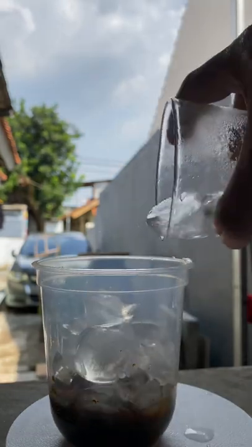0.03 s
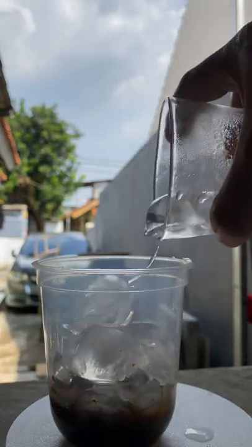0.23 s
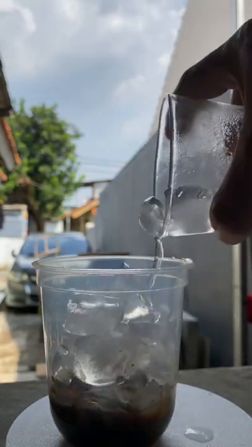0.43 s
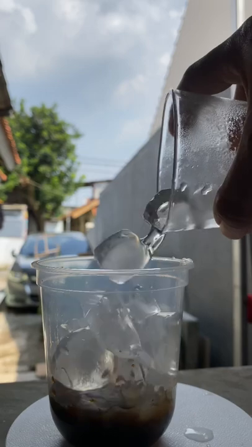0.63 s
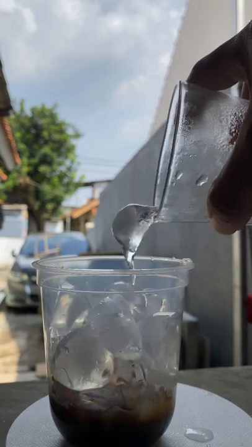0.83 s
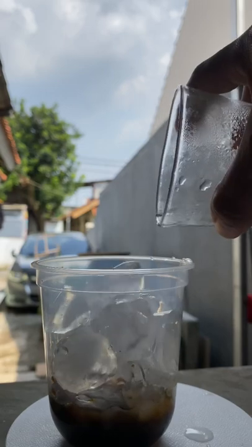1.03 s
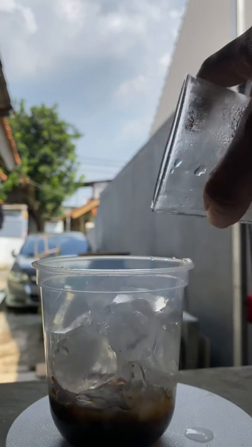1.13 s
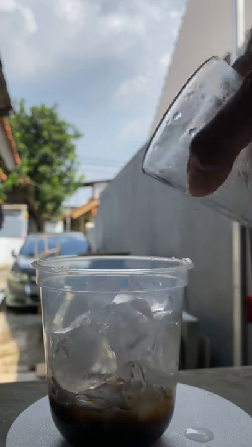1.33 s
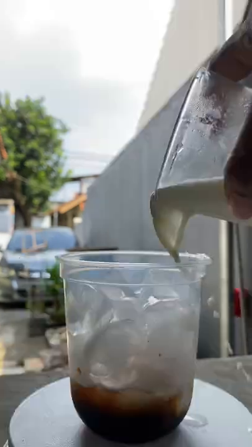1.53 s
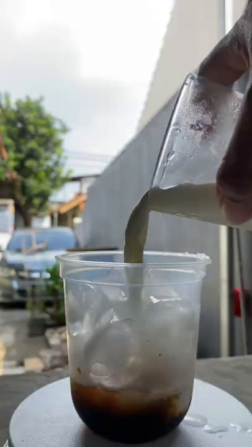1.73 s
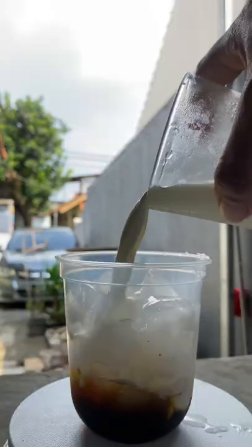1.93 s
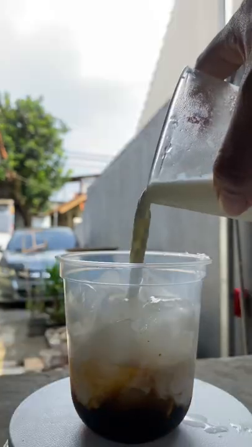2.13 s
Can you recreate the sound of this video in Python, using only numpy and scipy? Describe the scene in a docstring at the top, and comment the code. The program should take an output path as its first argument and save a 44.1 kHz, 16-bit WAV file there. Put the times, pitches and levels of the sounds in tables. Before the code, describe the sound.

Ice cubes clatter into a plastic cup, then liquid trickles faintly over them.

```python
"""Faint glassy taps as ice slides out of a beaker, then a close tumble into a thin plastic cup of ice.
The cubes knock hollow notes from the wall, clack and clink on one another, thud onto the pile and
scrape as they settle. Then a thin stream trickles over them in tiny bubbles, splashes and droplets.
Outdoors: a low rumble like distant traffic, a little hiss, and a short answer from nearby walls."""
import sys
import numpy as np
from scipy import signal
from scipy.fft import rfft, irfft, next_fast_len
from scipy.io import wavfile
from scipy.ndimage import uniform_filter1d, map_coordinates

SR = 44100
rng = np.random.default_rng(int(sys.argv[2]) if len(sys.argv) > 2 else 0)


def store_wav(level_fs):
    """Save 16-bit WAV to argv[1]."""
    pcm = np.round(np.clip(np.atleast_2d(level_fs), -1, 1) * 32767)
    wavfile.write(sys.argv[1], SR, pcm.T.astype(np.int16))


N = 97020

# ice knocking the cup wall: t/s, level/dB
KNOCK_CUES = [(.233, -28), (.2385, -4), (0.247, -16.5), (0.2547, -21.5), (0.2781, -18), (0.2894, -16),
              (0.3104, -15.5), (.317, -25.5), (0.3479, -20), (0.392, -33), (.400, -9.5), (0.4042, -13.5),
              (0.418, -9.5), (.434, -24.5), (0.476, -16), (0.4935, -25), (.504, -18), (0.516, -18.5),
              (0.5306, -15), (.546, -25), (0.5635, -18), (0.573, -22), (0.6029, -21), (.623, -31),
              (0.6294, -30.5), (0.6659, -11.5), (0.6766, -16.5), (0.7288, -14), (0.776, -24.5),
              (0.7832, -18), (0.7946, -20.5), (.821, -24), (.834, -22.5), (0.855, -29), (0.861, -30),
              (.880, -15.5), (0.8942, -18.5), (0.9008, -21.5), (0.918, -22), (.923, -20), (0.9428, -24),
              (.949, -27), (.9943, -20.5), (1.131, -30), (1.1804, -40), (1.1978, -36)]
# cup wall modes: f/Hz, level/dB, time to the top of the burst/s
CUP_MODES = [(1199, -1, 0.0023), (2192, -13, .0021), (1680, -33, 0.001), (3440, -30, 0.00033)]
# ice clacking on ice or on the beaker: t/s, level/dB, tilt above 1 kHz/(dB per octave)
CLACK_CUES = [(.038, -40, -1), (0.0502, -36.5, 27), (.066, -37.5, -1), (0.0882, -29.5, 0),
              (0.1131, -30.5, 19), (0.131, -34.5, 6), (.195, -38.5, 16.5), (0.232, -18.5, -3.5),
              (0.2373, -8, -4.5), (0.242, -17.5, -7.5), (0.312, -20.5, -0.5), (0.3168, -22.5, -4),
              (.371, -32, 3.5), (0.3996, -16, -4), (0.4143, -14.5, -2.5), (.4181, -15.5, 1),
              (0.49, -36, 6.5), (.5308, -20, -2.5), (0.542, -25, 4), (.556, -20.5, 1), (0.5683, -19, 2.5),
              (0.5749, -16.5, -3.5), (.581, -23.5, 2), (0.5925, -22.5, 2.5), (.598, -23.5, -2),
              (.618, -27, 6.5), (0.6648, -14.5, -1.5), (.670, -14, -1.5), (.726, -23, -11.5),
              (0.7477, -31.5, 0.5), (.774, -23, -1), (0.7823, -12, 6), (.795, -20.5, 0.5), (.810, -27, 2),
              (.8225, -22.5, 3), (.856, -20.5, 5), (0.8794, -21.5, -0.5), (0.8923, -18, -3.5),
              (0.92, -31, 3), (.943, -27, 0), (.9935, -30.5, -3), (1.1286, -21, 0.5), (1.1968, -29, -1.5)]
# ice cube modes: f/Hz, level/dB, t60/s
ICE_MODES = [(3414, -19, 0.032), (6520, -21, 0.022), (9760, -33, 0.016), (13620, -33.5, 0.023)]
# small cubes touching lightly: t/s, level/dB, f/Hz
CLINK_CUES = [(.114, -35.5, 6100), (.0885, -35.5, 3510), (.292, -21.5, 3200), (.303, -19.5, 3170),
              (.308, -22, 3100), (.3175, -27.5, 6350), (.337, -33, 6400), (.371, -25.5, 6300),
              (.569, -29, 7000), (.575, -15, 3450), (.6705, -19.5, 3380), (.7495, -31, 6500),
              (.750, -24.5, 4270), (.774, -34, 10100), (.856, -24, 4270), (1.1292, -25, 3470),
              (1.197, -33.5, 3370), (1.197, -31, 6470)]
# the weight of a cube landing on the pile: t/s, level/dB, f/Hz
THUD_CUES = [(0.237, -30, 450), (0.3182, -28.5, 330), (0.402, -32, 400), (0.4198, -28.5, 260),
             (.594, -26.5, 318), (0.627, -30.5, 250), (.669, -20.5, 427), (.674, -25.5, 190),
             (.7835, -28, 760), (.785, -22, 290), (0.826, -28.5, 295), (.895, -29.5, 219),
             (.921, -33.5, 380)]
# fader for cubes scraping and settling: t/s, level/dB
JOSTLE_FADER = [(0, -63), (.08, -66), (.125, -53), (.18, -76), (.225, -52.5), (.245, -38), (.36, -46),
                (.39, -45.5), (.42, -32.5), (.47, -47), (.525, -38), (.545, -38), (.59, -33), (.655, -40.5),
                (.68, -41.5), (.72, -45), (.765, -41), (.80, -39.5), (.85, -36.5), (.876, -47.5),
                (.90, -36.5), (.93, -34), (1.0, -45.5), (1.05, -60.5), (1.12, -71.5), (1.14, -49),
                (1.2, -47), (1.27, -79.5)]
# ice tapping the beaker as it starts to slide: t/s, level/dB
TAP_CUES = [(.089, -53), (0.1139, -43.5), (.121, -52), (.131, -46), (.158, -52.5)]
# beaker modes: f/Hz, level/dB, t60/s
BEAKER_MODES = [(2326, -16, .25), (4040, -5.5, .13), (5840, -7, 0.092), (7640, -7.5, .1),
                (10770, -10.5, .07)]
# splashes of the pour: t/s, level/dB, f/Hz
SPLASH_CUES = [(1.701, -51, 2190), (1.710, -38, 7960), (1.726, -43.5, 8200), (1.723, -36.5, 2710),
               (1.727, -40, 2830), (1.766, -47, 7600), (1.778, -45.5, 10800), (1.809, -36, 6600),
               (1.824, -48.5, 4770), (1.853, -38.5, 8750), (1.871, -39.5, 2220), (1.872, -40.5, 7500),
               (1.887, -38.5, 6830), (1.9714, -35, 5180), (1.982, -38.5, 6500), (2.0168, -34.5, 1730),
               (2.0175, -36, 2800), (2.018, -45, 900), (2.025, -44, 1850), (2.0582, -35, 2426),
               (2.067, -39.5, 5050), (2.067, -42, 2800), (2.089, -41.5, 2405), (2.18, -44.5, 1880),
               (2.188, -37, 7200)]
# drops striking the cup wall: t/s, level/dB
WALL_DROP_CUES = [(1.572, -54.5), (1.753, -43.5), (1.791, -42), (1.951, -41.5), (1.958, -49),
                  (2.027, -39.5), (2.087, -40.5), (2.188, -38.5)]
# fader for the droplet patter: t/s, level/dB
PATTER_FADER = [(1.52, -90.5), (1.58, -65.5), (1.68, -65), (1.72, -58), (1.84, -58), (1.96, -55),
                (2.08, -52.5), (2.14, -58.5), (2.2, -53.5)]
# faders for the traffic rumble and the drone within it: t/s, level/dB
RUMBLE_FADER = [(0, -44), (.6, -44), (.9, -43), (1.0, -38.5), (1.12, -41), (1.24, -43), (1.35, -42),
                (1.50, -43.5), (1.53, -48), (1.82, -45), (2.2, -46.5)]
DRONE_FADER = [(0, -44.5), (.5, -45.5), (.75, -43.5), (.87, -38), (1.0, -41.5), (1.2, -47.5), (1.33, -42.5),
               (1.49, -45.5), (1.54, -62), (2.2, -57)]
# tone colour of each noise layer: f/Hz, relative level/dB
CLACK_EQ = [(200, -14.5), (800, -13), (1500, -5.5), (2200, 5), (2700, -2.5), (3400, 5), (4300, -4),
            (6700, -5), (7700, -6.5), (8500, -16), (10000, -15.5), (12000, -29), (13500, -22.5),
            (14700, -40), (16000, -36)]
THUD_EQ = [(60, -25.5), (150, -3.5), (320, 3.5), (550, -6.5), (850, -6), (1500, -20), (4000, -45.5)]
JOSTLE_EQ = [(100, 0), (220, 12.5), (450, 2.5), (800, 2.5), (1170, 10), (1500, -1.5), (2150, 2), (2700, 3),
             (3400, -1.5), (4200, -3), (6500, -7), (7700, -11), (8500, -23), (10000, -23), (12000, -45.5),
             (13600, -29), (14700, -32), (16000, -34)]
PATTER_EQ = [(400, -23), (700, 0), (1200, 6), (1460, 1.5), (1850, 1.5), (2800, 4), (3600, 1), (4700, -5.5),
             (7000, -6.5), (8200, -11), (9700, -14), (12000, -22), (16000, -36.5)]
RUMBLE_EQ = [(20, -33.5), (40, -15.5), (62, -3), (82, 4), (110, -7.5), (141, -12), (175, -6.5),
             (240, -10.5), (330, -19.5), (600, -25.5), (1200, -45), (4000, -86.5)]
AIR_EQ = [(200, 4.5), (600, 6.5), (1200, -0.5), (1700, -3), (3500, -8), (7000, -16.5), (9000, -25.5),
          (12000, -30), (15000, -36)]
# resonances of the cup's hollow: f/Hz, width/Hz, gain over the direct sound/ratio
HOLLOW_MODES = [(1214, 120, 0.46), (2160, 77, 0.38), (3360, 143, 0.41)]
# reverb time of the nearby walls: f/Hz, t60/s
WALL_DECAY = [(150, 0.43), (1200, 0.27), (4000, 0.23), (8000, 0.21), (15000, 0.21)]
# the cup's balance at the two microphone ports: f/Hz, left minus right/dB
CUP_PAN = [(150, -2.5), (600, -8.5), (1150, -0.5), (1700, -4.5), (2200, -3), (3300, -3), (4800, -3.5),
           (7000, -1), (14000, -1)]
# phase between the ports at full lead: f/Hz, left lead/rad
LEFT_LEAD = [(500, 0.82), (1150, 1.03), (2100, 1.44), (2800, 2.87), (4000, 4.8), (6300, 5.1), (7500, 10.8),
             (9000, 7.13), (14000, 8.4)]

ICE_ATTACK_S = 0.00048


def amp(db):
    """Decibels to gain."""
    return 10 ** (np.asarray(db) / 20)


def unit(x):
    """Scale to rms 1."""
    return x / np.sqrt(np.mean(x ** 2) + 1e-20)


def along(points, hz):
    """Read a curve of (f/Hz, value) points on a log frequency axis."""
    f, values = np.transpose(points)
    return np.interp(np.log(hz + 1), np.log(f + 1), values)


def fader(rows):
    """Gain per sample from (t/s, level/dB) rows."""
    return amp(np.interp(np.arange(N) / SR, *np.transpose(rows)))


def bell(offset, width, power=2):
    """Bell curve: 1 at the centre, one half at an offset of one width."""
    return 1 / (1 + (offset / width) ** power)


def filtered(x, response):
    """Shape x with a frequency response."""
    n = x.shape[-1]
    padded = next_fast_len(n + SR // 10)
    return irfft(rfft(x, padded) * response(np.fft.rfftfreq(padded, 1 / SR)), padded)[..., :n]


def coloured(x, eq, tilt_db=0):
    """EQ x, tilt it per octave above 1 kHz and scale it to rms 1."""
    return unit(filtered(x, lambda f: amp(along(eq, f) + tilt_db * np.log2(np.maximum(f / 1000, 1)))))


def stereo(mid, side, side_db):
    """Mid and side to left and right."""
    return mid + amp(side_db) * np.array([side, -side])


def add(track, s, sound):
    """Mix a sound in at s seconds."""
    i = int(np.clip(round(s * SR), 0, N))
    track[..., i:i + sound.shape[-1]] += sound[..., :N - i]


def grains(spread_db, clump_db, per_s=1500, clumps_per_s=64):
    """Random tiny impacts that come in clumps, a few much larger than the rest."""
    swells = rng.standard_normal(int(N * clumps_per_s / SR) + 4)
    clumps = map_coordinates(swells, [np.arange(N) * clumps_per_s / SR])
    clicks = (rng.random(N) < per_s / SR) * rng.choice([-1, 1], N)
    sizes = np.minimum(rng.exponential(size=N), 3)
    return unit(clicks * amp(clump_db * clumps + spread_db * sizes))


def knocks(sag_per_s=0.04, ring_db=-15, ring_t60=0.057):
    """The thin wall gives a hollow burst and a faint after-ring; its pitch sinks as the cup fills."""
    out, t = np.zeros(N), np.arange(SR // 10) / SR
    for s, db in KNOCK_CUES:
        for hz, mode_db, top_s in CUP_MODES:
            burst_tune, ring_tune = rng.normal(1, [0.018, 0.06])
            age = t / top_s
            phase = 2 * np.pi * hz * (1 - sag_per_s * s) * t
            burst = age * np.exp((1 - age ** 2) / 2) * np.sin(phase * burst_tune)
            ring = amp(ring_db - 60 * t / ring_t60) * (1 - np.exp(-age)) * np.sin(phase * ring_tune)
            add(out, s, amp(db + mode_db) * (burst + ring))
    return out


def clacks(crack_s=0.0015, tail_s=0.012, tail_db=-16):
    """A hard, wide crack with a short crumbling tail; each cube rings at its own pitch."""
    out, t = np.zeros((2, N)), np.arange(SR // 10) / SR
    attack = 1 - np.exp(-t / ICE_ATTACK_S)
    decay = np.exp(-t / crack_s) + amp(tail_db) * np.exp(-t / tail_s)
    for s, db, tilt_db in CLACK_CUES:
        mid, side = coloured(rng.standard_normal((2, len(t))), CLACK_EQ, tilt_db)
        crack = attack * decay * unit(stereo(mid, side, side_db=-4))
        ring = 0
        for hz, mode_db, t60 in ICE_MODES:
            fade = amp(mode_db + rng.normal(0, 2) - 60 * t / t60)
            ring += fade * np.sin(2 * np.pi * hz * rng.normal(1, 0.016) * t)
        add(out, s, amp(db) * (crack + ring))
    return out


def clinks(decay_s=0.0027):
    """A glancing touch rings one mode of a cube, which wet ice damps fast."""
    out, t = np.zeros(N), np.arange(SR // 20) / SR
    envelope = (1 - np.exp(-t / ICE_ATTACK_S)) * np.exp(-t / decay_s)
    for s, db, hz in CLINK_CUES:
        add(out, s, amp(db) * envelope * np.sin(2 * np.pi * hz * t))
    return out


def thuds(attack_s=0.00043, decay_s=0.0044, boom_top_s=0.0028, boom_db=-5):
    """A landing cube sends a dull push through the pile and a short boom from the cup's base."""
    out, t = np.zeros(N), np.arange(SR // 10) / SR
    envelope = (1 - np.exp(-t / attack_s)) * np.exp(-t / decay_s)
    for s, db, hz in THUD_CUES:
        push = envelope * coloured(rng.standard_normal(len(t)), THUD_EQ)
        boom = t / boom_top_s * np.exp(1 - t / boom_top_s) * np.sin(2 * np.pi * hz * t)
        add(out, s, amp(db) * (push + amp(boom_db) * boom))
    return out


def jostle(chatter_hz=1176, chatter_db=-7):
    """Wet cubes scrape and settle in a spray of tiny contacts, which set the cup wall chattering."""
    contacts = np.array([grains(spread_db=5, clump_db=1.5) for _ in range(3)])
    mid, side = coloured(contacts[:2], JOSTLE_EQ)
    chatter = unit(filtered(contacts[2], lambda f: bell(f - chatter_hz, width=130, power=4)))
    return fader(JOSTLE_FADER) * (stereo(mid, side, side_db=-9) + amp(chatter_db) * chatter)


def beaker():
    """Each tap of the sliding ice leaves the beaker ringing faintly."""
    out, t = np.zeros(N), np.arange(SR // 4) / SR
    attack = 1 - np.exp(-t / ICE_ATTACK_S)
    for s, db in TAP_CUES:
        for hz, mode_db, t60 in BEAKER_MODES:
            fade = amp(db + mode_db + rng.normal(0, 2.05) - 60 * t / t60)
            add(out, s, attack * fade * np.sin(2 * np.pi * hz * t + rng.uniform(0, 2 * np.pi)))
    return out


def blip(hz, t, cycles_to_top, glide=0.012):
    """The note of a bubble or drop: a soft start and a slight rise in pitch."""
    age = t * hz / cycles_to_top
    return age * np.exp(1 - age) * np.sin(2 * np.pi * hz * t * (1 + glide * np.minimum(age, 4)))


def splashes(bubble_db=-2.5, spray_db=-3.5, cycles_to_top=4.5, width_octaves=0.34):
    """A short bubble inside a wet spray around the same pitch; small, high drops snap faster."""
    out, t = np.zeros(N), np.arange(SR // 30) / SR
    for s, db, hz in SPLASH_CUES:
        age = t * hz / cycles_to_top
        noise = rng.standard_normal(len(t))
        band = filtered(noise, lambda f: (1 + (np.log2((f + 1) / hz) / width_octaves) ** 2 / 2) ** -2)
        spray = age * np.exp(1 - age) * unit(band)
        bubble = blip(hz, t, cycles_to_top=4.6)
        add(out, s, amp(db) * (amp(bubble_db) * bubble + amp(spray_db) * spray))
    return out


def wall_drops(note_hz=1220):
    """Drops strike the cup wall and sound its hollow note."""
    out, t = np.zeros(N), np.arange(SR // 30) / SR
    for s, db in WALL_DROP_CUES:
        add(out, s, amp(db) * blip(note_hz * rng.normal(1, 0.026), t, cycles_to_top=2.9))
    return out


def patter(lowest_hz=1250):
    """Four sizes of droplet, an octave apart, land softly in clumps of their own."""
    droplets = np.zeros(N)
    for octave in range(4):
        impacts = grains(spread_db=3, clump_db=3)
        droplets += filtered(impacts, lambda f: bell(np.log2((f + 1) / lowest_hz) - octave, width=0.5))
    return fader(PATTER_FADER) * unit(in_cup(coloured(droplets, PATTER_EQ)))


def in_cup(x):
    """The hollow of the cup rings along with what happens in it."""
    return filtered(x, lambda f: 1 + sum(gain * 1j * f * width / (hz ** 2 - f ** 2 + 1j * f * width)
                                         for hz, width, gain in HOLLOW_MODES))


def placed(x, wet_db, scatter_db, lead_share=1, scatter_s=0.0008, low_cut_hz=1900):
    """Direct sound at two microphone ports, quick scatter off cup and table, and the walls' answer."""
    hz, t, spectrum = signal.stft(rng.standard_normal((2, SR // 2)), SR, nperseg=256)
    envelope = amp(-60 * t / along(WALL_DECAY, hz)[:, None]) * (1 - np.exp(-t / 0.001))
    tail = signal.istft(spectrum * envelope, SR, nperseg=256)[1]
    tail = tail + 0.077 * tail[::-1]  # slight bleed between left and right
    scatter = rng.standard_normal(tail.shape) * np.exp(-np.arange(tail.shape[1]) / SR / scatter_s)
    scatter = filtered(scatter / np.linalg.norm(scatter[0]), lambda f: 1 - bell(f, low_cut_hz))
    reflections = amp(wet_db) * tail / np.linalg.norm(tail[0]) + amp(scatter_db) * scatter
    wet = signal.fftconvolve(np.atleast_2d(x), reflections, axes=1)[:, :N]
    split = np.array([[.5], [-.5]])
    direct = filtered(x, lambda f: np.exp(1j * split * lead_share * along(LEFT_LEAD, f)))
    return filtered(direct + wet, lambda f: amp(split * along(CUP_PAN, f)))


def traffic(drone_hz=140.3):
    """A distant, nearly mono rumble with a narrow drone in it, as of a far engine."""
    drone = unit(filtered(rng.standard_normal(N), lambda f: bell(f - drone_hz, width=17)))
    rumble = stereo(*coloured(rng.standard_normal((2, N)), RUMBLE_EQ), side_db=-23)
    return (fader(RUMBLE_FADER) * rumble + fader(DRONE_FADER) * drone) * amp([[-.6], [.6]])


def background(air_db=-61.5, dip_at_s=1.511, dip_length_s=0.014, dip_db=-18):
    """A bed of traffic and wide, faint open-air hiss; its level dips briefly once."""
    t = np.arange(N) / SR
    in_dip = (t > dip_at_s) & (t < dip_at_s + dip_length_s)
    dip = uniform_filter1d(amp(dip_db * in_dip), size=90)
    rumble = traffic()
    air = stereo(*coloured(rng.standard_normal((2, N)), AIR_EQ), side_db=0.5)
    return dip * (rumble + amp(air_db) * air)


def scene():
    """Ice, then liquid, close up in the open air."""
    cup = placed(knocks(), wet_db=-16.5, scatter_db=-13)
    cubes = in_cup(clacks() + clinks() + thuds() + jostle())
    ice = placed(cubes + beaker(), wet_db=-12, scatter_db=-9)
    pour = placed(splashes() + wall_drops() + patter(), wet_db=-14.5, scatter_db=-9, lead_share=0.22)
    pour *= amp([[1.7], [-1.7]])  # nudged to the left of the ice
    return cup + ice + pour + background()


def record(dry, peak_hz=13550, peak_db=5, top_hz=16000):
    """A narrow lift in the top treble brings out the highest ring of the ice; a steep high cut follows."""
    bright = filtered(dry, lambda f: amp(peak_db * bell(f - peak_hz, width=380)))
    return filtered(bright, lambda f: 1 / (1 + (f / top_hz) ** 120))


dry = scene()
out = record(dry)
store_wav(out)
```